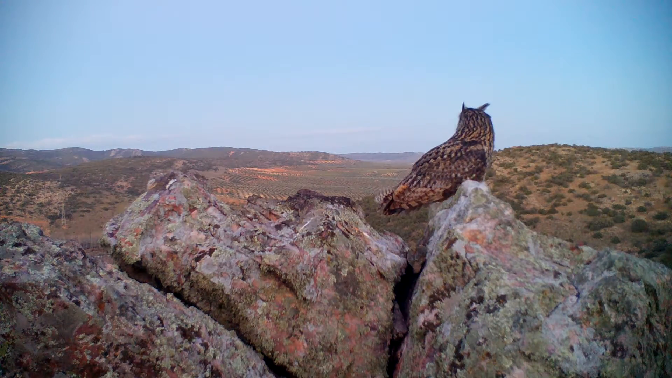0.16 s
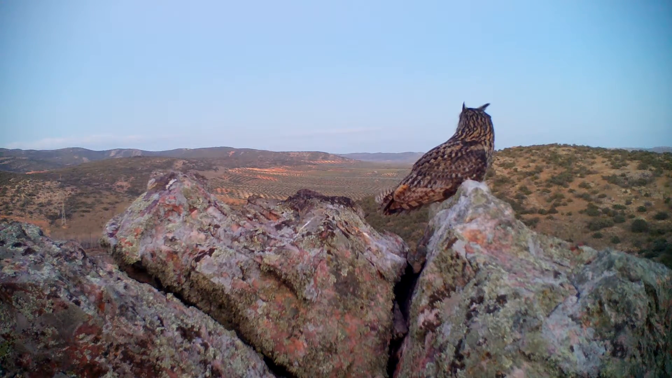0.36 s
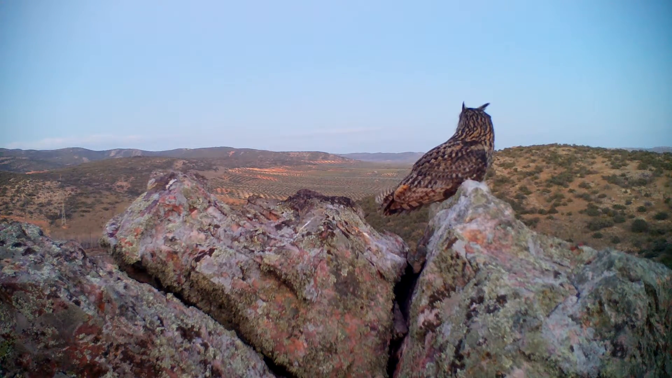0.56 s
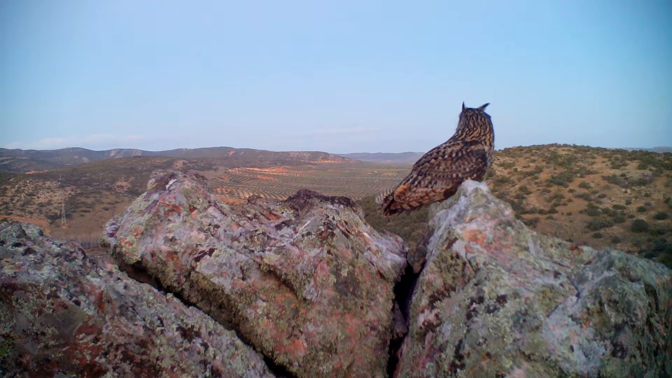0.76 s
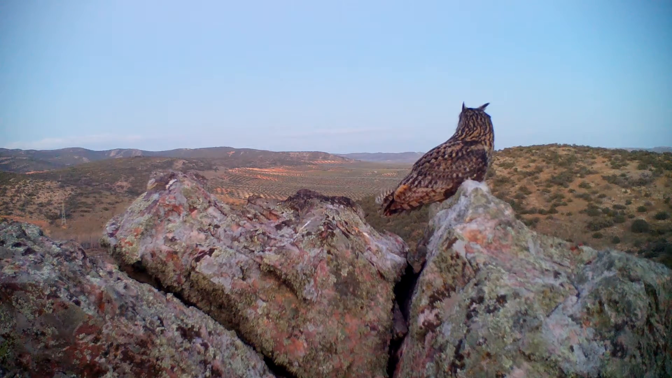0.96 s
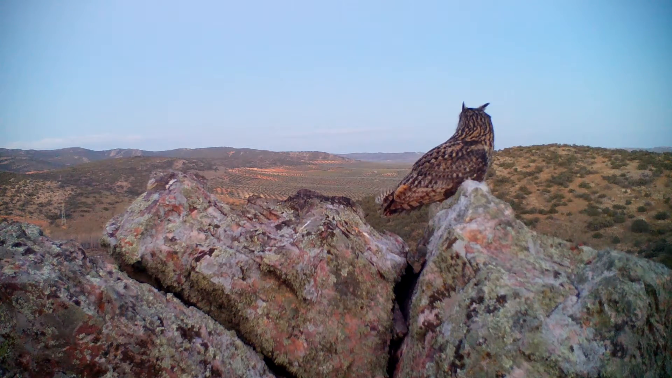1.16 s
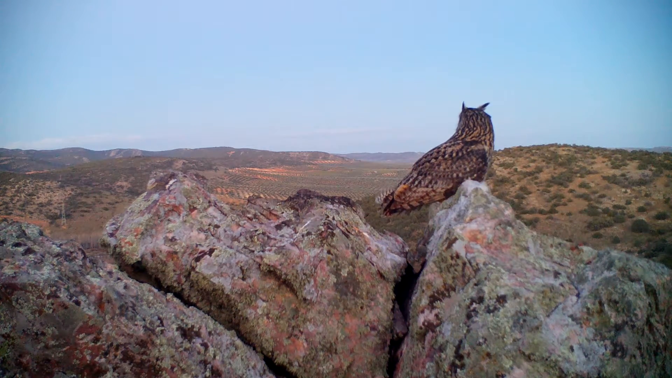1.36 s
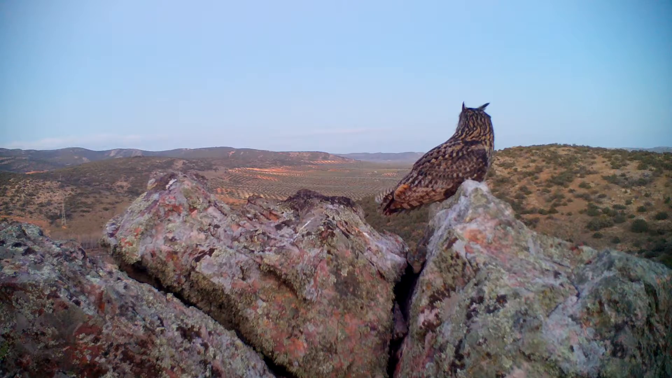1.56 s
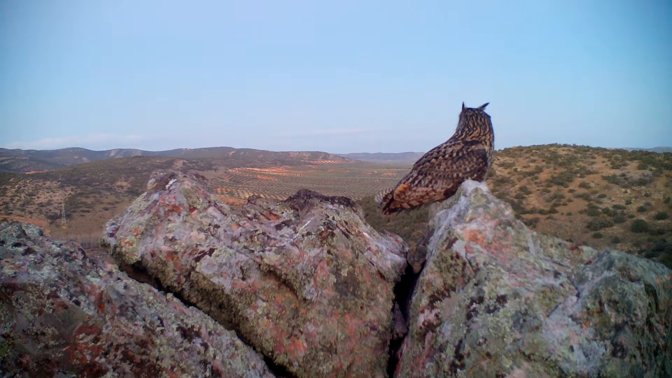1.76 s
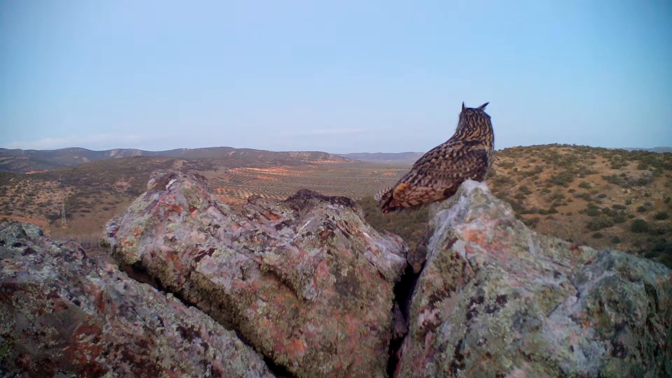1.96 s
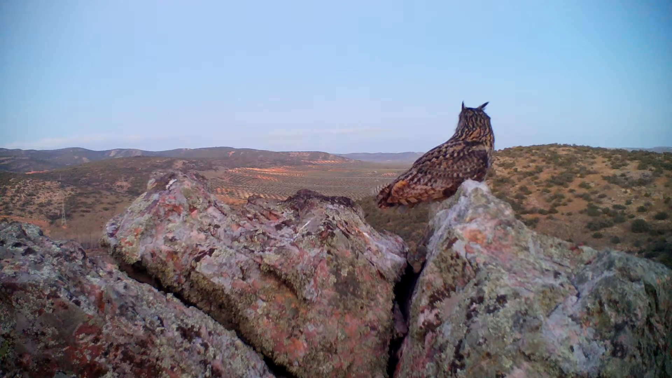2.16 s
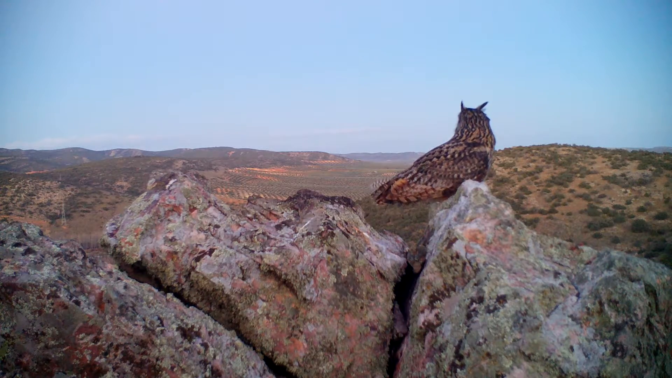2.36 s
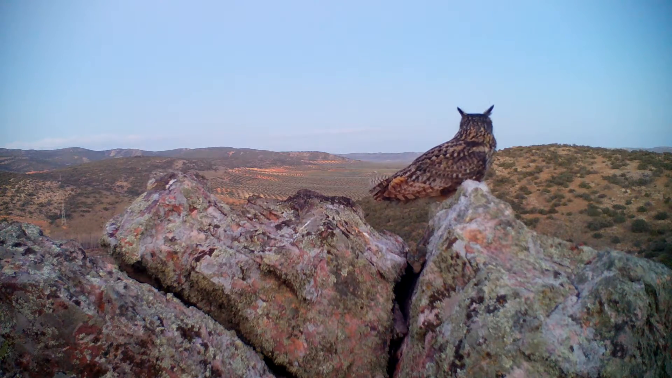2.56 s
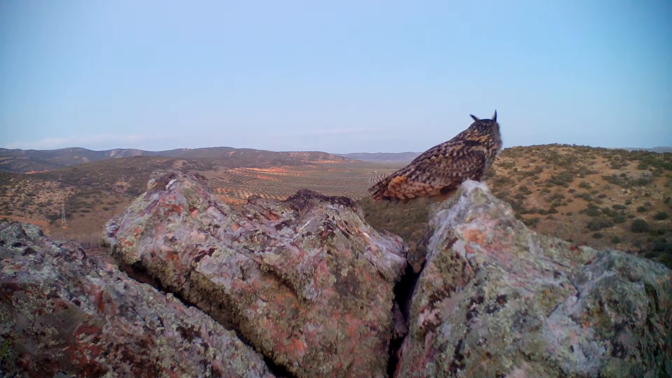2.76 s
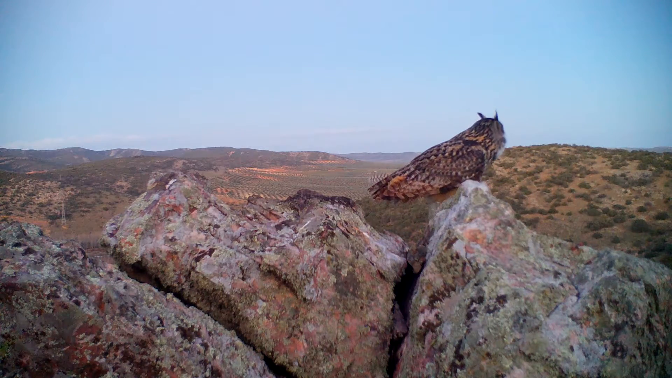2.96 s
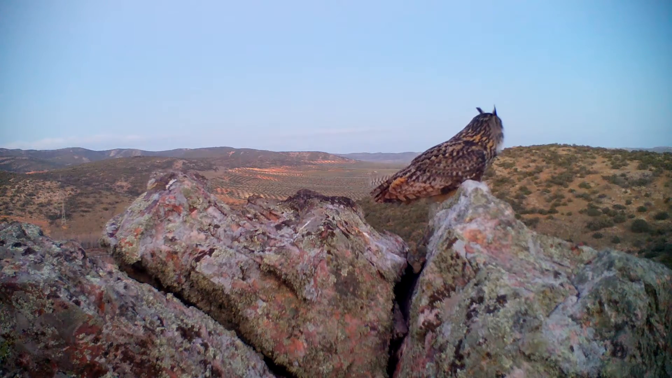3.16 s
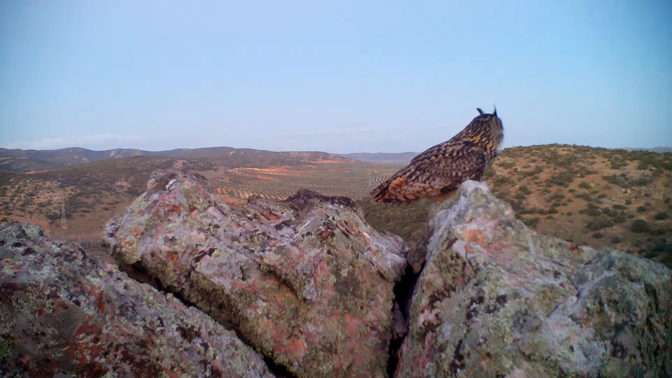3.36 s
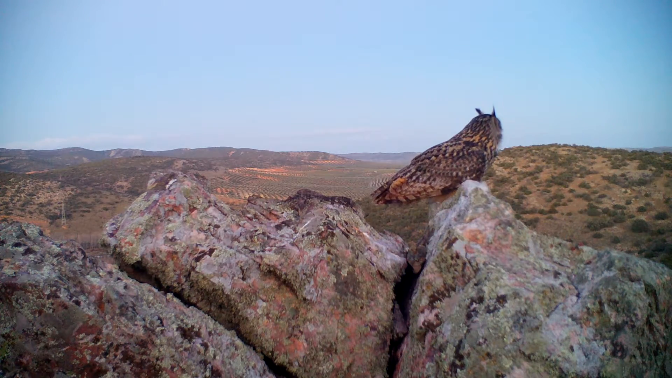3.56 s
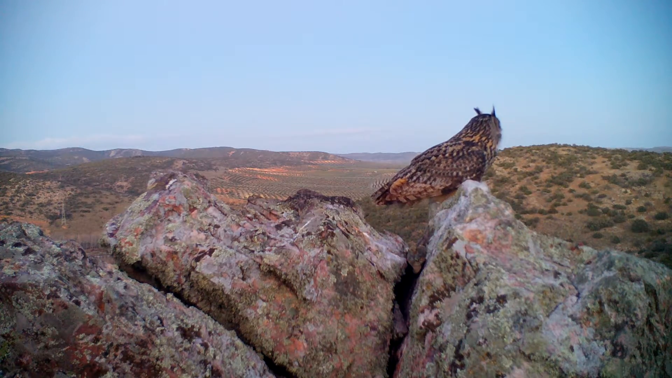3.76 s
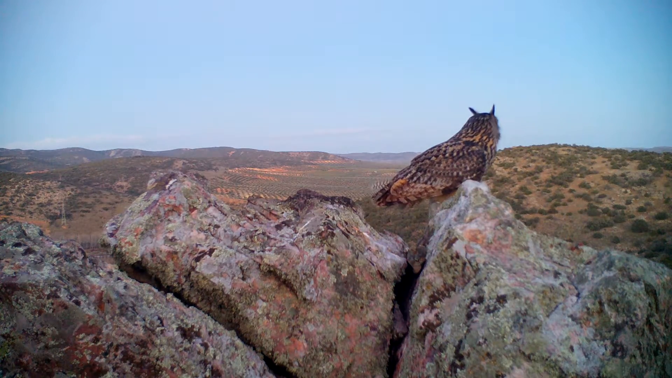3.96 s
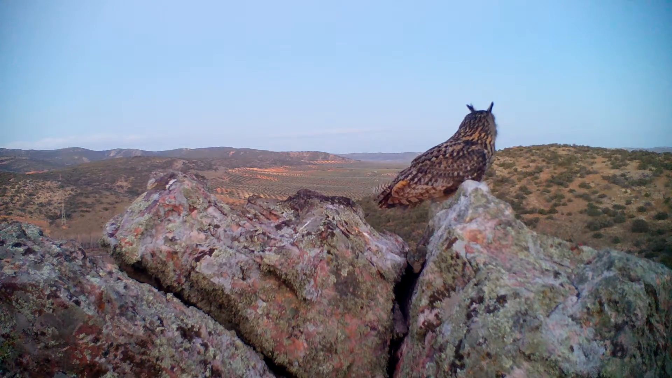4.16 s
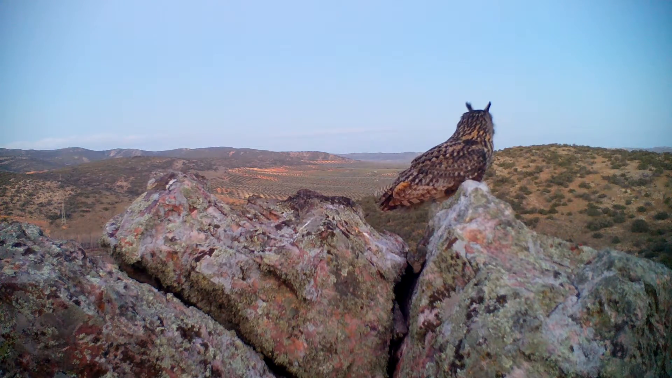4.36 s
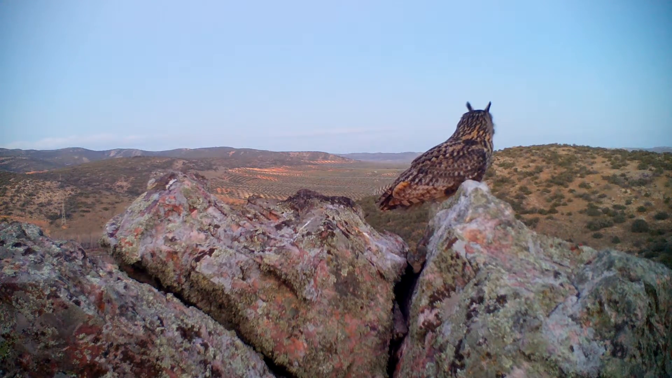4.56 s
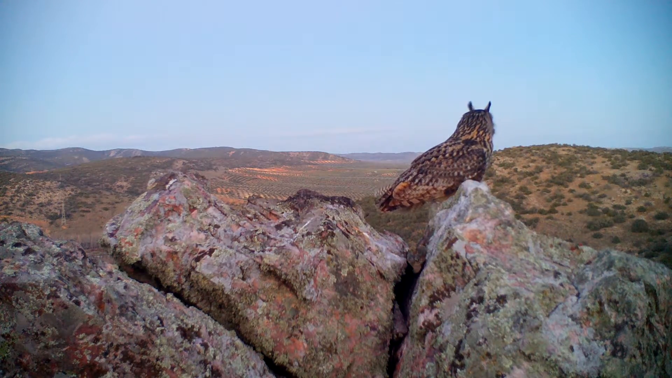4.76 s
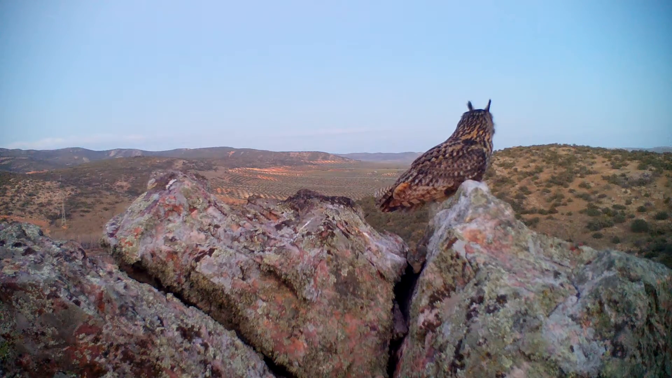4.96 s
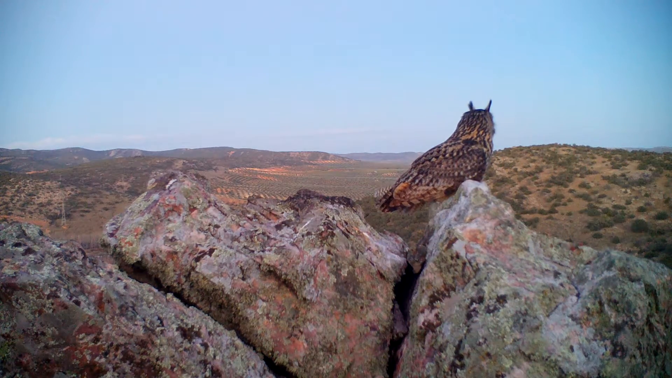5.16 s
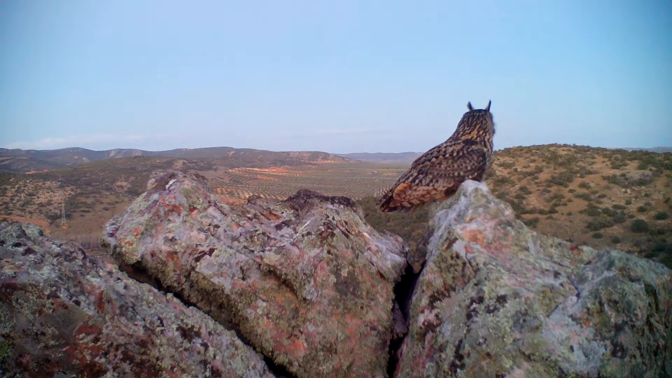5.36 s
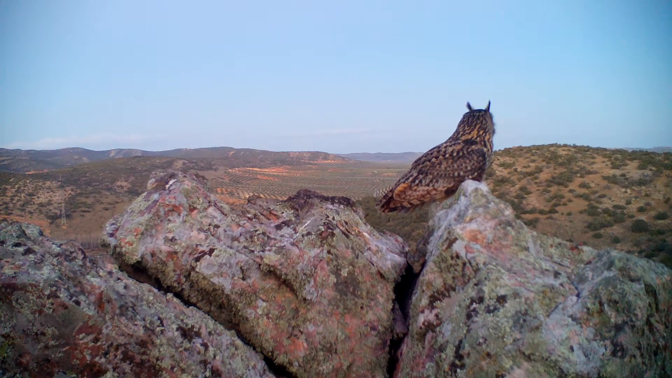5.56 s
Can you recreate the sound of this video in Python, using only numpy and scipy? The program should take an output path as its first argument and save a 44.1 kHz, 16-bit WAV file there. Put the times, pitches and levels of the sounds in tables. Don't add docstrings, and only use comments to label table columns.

```python
import sys
import numpy as np
from scipy import signal
from scipy.fft import rfft, irfft, next_fast_len
from scipy.io import wavfile
from scipy.ndimage import uniform_filter1d, map_coordinates

SR = 44100
rng = np.random.default_rng(int(sys.argv[2]) if len(sys.argv) > 2 else 0)


def how_loud(loudness_db):
    steps = np.asarray(loudness_db, float) / 20
    return 10 ** steps


def to_wav(sig):
    pcm = np.clip(np.atleast_2d(sig), -1, 1) * 32767
    pcm = np.round(pcm).astype(np.int16)
    wavfile.write(sys.argv[1], SR, pcm.T)


N = 246959

# (frequency [Hz], density [dB per Hz])
HUM_SPECTRUM = [(15, -22.5), (146, -13), (311, -6.5), (520, -5.5), (750, -1.05), (2010, -8), (7000, -40),
                (9100, -62.5)]
# (frequency [Hz], density [dB per Hz])
TWITTER_SPECTRUM = [(1500, -60), (2400, 3.5), (3200, 2.5), (4500, -11), (6500, -43.5), (8000, -70.5)]
HUM_DB, TWITTER_DB = -59.5, -75

# (frequency [Hz], density [dB per Hz])
HISS_SPECTRUM = [(5000, -20), (7000, -3), (9000, 0), (15700, 1)]
# (time [s], length [s])
LOCK_SLIPS = [(1.195, 0.028), (1.401, 0.022), (1.568, 0.022), (2.563, 0.023), (4.087, 0.044)]
WHINE_HZ, FLIP_S, FIRST_FLIP_S = 7796.3, .0168033, .0036

# (time [s], level [dB])
GUST_LEVEL = [(4.3, -93), (4.43, -91), (4.484, -82), (4.74, -76), (4.806, -89), (4.932, -67.5),
              (5.102, -60), (5.376, -63), (5.6, -89)]
# (time [s], peak [dB], frequency [Hz])
PUFFS = [(4.924, -54.5, 67), (4.984, -54.5, 130), (5.046, -51, 108), (5.079, -42.5, 131), (5.1, -49, 100),
         (5.113, -37.5, 192), (5.146, -51, 110.6), (5.156, -60, 81), (5.192, -43.5, 290), (5.2, -38.5, 275),
         (5.211, -37.5, 372), (5.221, -27, 156.5), (5.229, -35.5, 393), (5.238, -35.5, 179),
         (5.276, -60, 200), (5.288, -46, 172), (5.342, -51, 128), (5.367, -44.5, 180), (5.388, -48.5, 91)]
# (frequency [Hz], density [dB per Hz])
BUFFET_SPECTRUM = [(10, -21), (20, 4), (60, 3), (110, -9.5), (200, -17.5), (400, -53.5)]

# (time [s], length [s], low voice [Hz], high voice [Hz], level [dB])
WHISTLE_CALLS = [(1.772, 0.068, 4950, 5530, -65), (2.093, 0.063, 4960, 5620, -66),
                 (3.062, .052, 5000, 5620, -71.5), (3.313, 0.035, 4930, 5620, -74),
                 (3.545, 0.033, 4790, 5430, -71.5), (4.037, 0.055, 4970, 5620, -70),
                 (4.52, .048, 5000, 6000, -67), (4.669, 0.081, 4880, 5860, -66.5),
                 (4.853, 0.071, 4770, 5590, -54), (5.007, 0.063, 4720, 6020, -54),
                 (5.156, 0.0593, 4950, 6220, -54), (5.412, .048, 4736, 6130, -57.5)]
# (time [s], length [s], start [Hz], end [Hz], level [dB])
SLIDING_NOTES = [(1.176, 0.012, 2720, 2180, -66), (3.288, 0.0088, 2640, 2530, -66),
                 (3.509, 0.011, 2650, 2680, -60), (3.517, 0.018, 2980, 3260, -70),
                 (3.56, 0.025, 2570, 2480, -74), (3.62, .015, 3560, 3260, -73),
                 (3.718, .03, 6400, 6490, -86), (3.853, .025, 6570, 6600, -91),
                 (4.275, 0.0114, 3600, 2650, -66), (4.28, 0.021, 2900, 2250, -62),
                 (4.353, 0.015, 2830, 2380, -67), (4.435, 0.009, 2830, 2900, -64),
                 (4.516, 0.014, 2150, 1890, -64), (4.728, 0.011, 2640, 2340, -57),
                 (4.839, 0.013, 3330, 3120, -65), (4.99, 0.019, 3700, 3670, -67),
                 (5.328, 0.027, 2674, 1780, -50.5), (5.563, .013, 6760, 6460, -80),
                 (5.585, 0.016, 2900, 2270, -62.5)]
# (delay [s], length [s], start [Hz], end [Hz], level [dB])
FORK_PARTS = [
    (0, 0.019, 3460, 2780, 1.5),
    (.001, 0.023, 6550, 5640, -9.5),
    (.004, .016, 3400, 3750, 1),
]
# (delay [s], length [s], start [Hz], end [Hz], level [dB])
CHUCK_PARTS = [
    (0, 0.0203, 3000, 3750, -3.5),
    (.003, 0.015, 3590, 4330, -8),
    (.018, 0.023, 3184, 3170, -2),
]
# (time [s], pitch factor [-], level [dB])
FORK_CALLS = [(5.144, 0.98, -63), (5.404, 0.98, -64)]
# (time [s], pitch factor [-], level [dB])
CHUCK_CALLS = [(5.306, 1.0, -51), (5.562, 1.09, -48.5)]
USUAL_DB, EASY_HZ, SHORT_S = -63, 5600, .0505
TICK_DB, TICK_GROWS, HIGH_DB, HIGH_GROWS = -59, .57, -71.5, .45
OVERSHOOT, OVERSHOOT_KHZ, OVERSHOOT_GROWS, DROOP, DROOP_KHZ = -.11, .22, .008, .015, .102
SLUR_DB, SLUR_GROWS = -8, -1.1
BREAK_S, AGAIN_S, AGAIN_DB = .0066, .022, -2.5
FADE_DB = -3
BEND = 1.8

# (time [s], length [s], low voice [dB], high voice [dB], pitch factor [-])
CHATTER_SWOOPS = [(4.338, .043, -50, -51.5, 1.06), (4.422, .045, -51.5, -53, 1.01),
                  (4.518, .05, -51.5, -52.5, .98), (4.637, 0.06, -54, -57, .94),
                  (4.749, 0.038, -53.5, -54.5, .94), (4.853, .052, -57.5, -53, .97),
                  (4.956, 0.062, -54.5, -54, .99)]
# (share of rise [-], low voice [Hz], high voice [Hz], level [dB])
SWOOP_RISE = [(0, 1700, 2900, -14), (.28, 2900, 5600, 0), (.5, 4000, 6800, -1), (.7, 4350, 7200, -1),
              (1, 4450, 7300, -2)]
# (frequency [Hz], width [Hz], gain [dB])
SMALL_THROAT = [(2900, 670, 8), (5400, 270, 6)]
RISE_SHARE = .47
HOARSE_HZ = 90

# (time [s], pitch [Hz], effort [dB])
HOOT_AIM = [(2.367, 284.3, -2.5), (2.456, 356.7, 1), (2.6, 359, 1.5), (2.63, 353, 1.2), (2.704, 306.6, .2),
            (2.841, 283.5, 0.4), (2.93, 260, 2.9), (2.999, 221, -1.5), (3.012, 196, -0.5)]
# (pitch [Hz], phase [rad])
SAC_TWIST = [(280, 1.8), (296, 2.1), (303, -.5), (314, -2.3), (330, -1.7), (345, -.4), (360, -.2)]
SYRINX_DB = [-0.5, -9.5, -25, -42.5]
# (multiple [-], level [dB])
UPPER_PARTIALS = [(5, 3.5), (6, -6.5), (7, -8), (8, -9), (9, -11.5)]
# (frequency [Hz], level [dB])
BEAK_RESPONSE = [(1150, -82.5), (1400, -66.5), (1480, -61), (1660, -59), (1750, -67.5), (2100, -69.5),
                 (2500, -65.5), (3300, -74)]
# (frequency [Hz], gain [dB])
SAC_RESPONSE = [(200, -56.5), (270, -44), (335, -22), (365, -23), (420, -27), (700, -25), (1100, -20.5),
                (1400, -13.5)]
# (frequency [Hz], width [Hz], gain [dB])
PIPE_PEAKS = [(237.5, 5.3, -13), (273.3, 12, -11), (452, 41, 7.5), (520, 200, -9.5), (574.4, 15, -13),
              (605.5, 7, -28), (676, 11, -1.5), (840, 32, 8), (1016, 89, -22.5), (1260, 41, -10.5),
              (1401, 37, 6)]
# (frequency [Hz], level [dB], offset [s])
THROAT_RINGS = [(401, 1.5, 0), (773, -8, -.004)]
SLIDE_S, SCOOP_HZ, SCOOP_S, ONSET_DB, ONSET_S = 2.377, 119.9, .013, -19.5, .013
FLAPS_S, FLAP_GAP_S, FLAP_TOP_S, FLAP_DB, FLAP_SPAN_S = 3.013, .007, 3.028, -33, .007


def unit(x):
    return x / np.sqrt(np.mean(x ** 2) + 1e-20)


def wobble(rate, size):
    knots = rng.standard_normal(int(size * rate / SR) + 4)
    return map_coordinates(knots, [np.arange(size) * rate / SR])


def filtered(x, response):
    m = next_fast_len(N + SR // 2)
    return irfft(rfft(x, m) * response(np.fft.rfftfreq(m, 1 / SR)), m)[:N]


def noise(spectrum):
    f, db = np.transpose(spectrum)
    shape = lambda hz: how_loud(np.interp(np.log(hz + 1), np.log(f + 1), db))
    return unit(filtered(rng.standard_normal(N), shape))


def add(track, s, sound):
    part = track[round(s * SR):][:len(sound)]
    part += sound[:len(part)]


def tone(hz, db, fade_s):
    t = np.arange(len(hz)) / SR
    ends = np.clip(np.minimum(t, t[::-1]) / fade_s, 0, 1)
    envelope = np.sqrt(2) * how_loud(db) * np.sin(np.pi / 2 * ends) ** 2
    return envelope * np.sin(2 * np.pi * np.cumsum(hz) / SR)


def bumps(peaks, hz):
    return sum(db / (1 + ((hz - c) / w * 2) ** 2) for c, w, db in peaks)


def echoes(x, t60_s, build_s, low_hz):
    t = np.arange(SR // 2) / SR
    tail = rng.standard_normal(len(t)) * how_loud(-60 * t / t60_s) * (1 - np.exp(-t / build_s))
    wet = signal.fftconvolve(x, tail / np.linalg.norm(tail))[:N]
    return filtered(wet, lambda hz: (hz > low_hz) / (1 + (hz / 6500) ** 4))


def valley():
    hum_db = HUM_DB + .21 * wobble(.29, N) + .15 * wobble(5.4, N)
    hum = how_loud(hum_db) * noise(HUM_SPECTRUM)
    return hum + how_loud(TWITTER_DB + .98 * wobble(20, N)) * noise(TWITTER_SPECTRUM)


def whine():
    t = np.arange(N) / SR
    lost = sum(np.clip(np.minimum(t - s, s + length - t) / .0013, 0, 1) for s, length in LOCK_SLIPS)
    hz = WHINE_HZ + lost * (300 + 200 * wobble(150, N))
    phase = 2 * np.pi * np.cumsum(hz) / SR
    sign = np.sign(np.sin(np.pi * (t - FIRST_FLIP_S) / FLIP_S))
    level = how_loud(-76.5 + lost * (4 * wobble(330, N) - 2.5))
    ticks = 2.2 * np.gradient(np.abs(np.gradient(sign)))
    return level * (ticks + sign * np.sin(phase) + how_loud(-24) * np.sin(2 * phase))


def gust():
    s, db = np.transpose(GUST_LEVEL)
    strength = how_loud(np.interp(np.arange(N) / SR, s, db, left=-120) + 2.5)
    out = strength * unit(how_loud(2.9 * wobble(4.7, N)) * noise(BUFFET_SPECTRUM))
    half = SR // 20
    u = np.arange(-half, half) / SR
    for (at, db, hz), turn in zip(PUFFS, rng.normal(0, 1.0, len(PUFFS))):
        swell = how_loud(db) * np.exp(-(u * hz / .54) ** 2)
        add(out, at - half / SR, swell * np.cos(2 * np.pi * hz * u + turn))
    return out


def whistles():
    out = np.zeros(N)
    for s, length, low_hz, high_hz, low_db in WHISTLE_CALLS:
        louder_db = low_db - USUAL_DB
        tick_db, high_db = TICK_DB + TICK_GROWS * louder_db, HIGH_DB + HIGH_GROWS * louder_db
        strain_khz = (high_hz - EASY_HZ) / 1000
        overshoot = OVERSHOOT + OVERSHOOT_KHZ * strain_khz + OVERSHOOT_GROWS * louder_db
        droop = DROOP + DROOP_KHZ * strain_khz
        tick = np.linspace(2700, 2300, round(.013 * SR))
        add(out, s, tone(tick, tick_db, .0025) + tone(2 * tick, tick_db - 20, .004))
        # (Hz, dB, slur s, delay s)
        voices = ((low_hz, low_db, .003, .009),
                  (high_hz, high_db, .0025, .006),
                  (high_hz + 700, high_db - 20, .0025, .006),
                  (low_hz + high_hz, low_db - 41, .0025, .012),
                  (2 * low_hz, low_db - 42, .0025, .012))
        for hz, db, slur_s, late in voices:
            t = np.arange(round((length - late + BREAK_S + AGAIN_S) * SR)) / SR
            slur = np.exp(-(t / slur_s) ** 2 / 2)
            bend = overshoot * np.exp(-t / .008) - droop * (t / length) ** 2 - .5 * slur
            glide = hz * (1 + bend + .007 * wobble(300, len(t)))
            db = db + (SLUR_DB + SLUR_GROWS * louder_db) * slur
            db = db + FADE_DB * np.minimum(t / length, 1) ** 2 + 2.3 * wobble(200, len(t))
            first, second = round((length - late) * SR), round((length - late + BREAK_S) * SR)
            add(out, s + late, tone(glide[:first], db[:first], .0035))
            if length < SHORT_S:
                add(out, s + length + BREAK_S, tone(glide[second:], db[second:] + AGAIN_DB, .0035))
    return out


def sliding_notes():
    out = np.zeros(N)
    notes = list(SLIDING_NOTES)
    for phrase, calls in ((FORK_PARTS, FORK_CALLS), (CHUCK_PARTS, CHUCK_CALLS)):
        for s, factor, db in calls:
            for late, length, start_hz, end_hz, part_db in phrase:
                notes.append((s + late, length, factor * start_hz, factor * end_hz, db + part_db))
    for s, length, start_hz, end_hz, db in notes:
        u = np.linspace(0, 1, round(length * SR))
        glide = start_hz + (end_hz - start_hz) * u ** BEND
        glide = glide * (1 + .012 * wobble(250, len(u)))
        add(out, s, tone(glide, db + 2.5 * wobble(150, len(u)), .2 * length))
    return out


def chatter():
    out = np.zeros(N)
    share, low_hz, high_hz, shape_db = np.transpose(SWOOP_RISE)
    for s, length, low_db, high_db, factor in CHATTER_SWOOPS:
        t, rise = np.arange(round(length * SR)) / SR, RISE_SHARE * length
        after = np.maximum(t - rise, 0)
        tremble = np.clip((t - rise) / .009 + .4, 0, 1) * np.cos(2 * np.pi * 138 * (t - rise))
        shape = np.interp(t / rise, share, shape_db) - 4 * tremble - 120 * after
        shape = shape + (1 + 100 * after) * wobble(399, len(t))

        def sweep(rise_hz, fall_hz, depth_hz):
            path = np.interp(t / rise, share, rise_hz) - fall_hz * after / .025
            path = uniform_filter1d(path, size=120, mode="nearest")
            return factor * (path + depth_hz * tremble) + HOARSE_HZ * wobble(700, len(t))

        low, high = sweep(low_hz, 2100, 550), sweep(high_hz, 2400, 750)
        add(out, s, tone(low, low_db - 6.5 + shape + bumps(SMALL_THROAT, low), .0023))
        add(out, s, tone(high, high_db - 9.5 + shape + bumps(SMALL_THROAT, high), .002))
        add(out, s, tone(2 * low, low_db + shape - 27, .0068))
        add(out, s, tone(high - low, low_db - 15, .0062))
        for hz in (low + high, 3 * low, 2 * high, high + 2 * low):
            add(out, s, tone(hz + 500 * wobble(900, len(t)), low_db + shape - 40.5, .005))
    return out


def hoot_voice():
    s, hz, effort = np.transpose(HOOT_AIM)
    t = np.arange(round(s[0] * SR), round(s[-1] * SR)) / SR
    hz = np.interp(t, s, hz) - SCOOP_HZ * np.exp(-np.maximum(t - SLIDE_S, 0) / SCOOP_S)
    hz = uniform_filter1d(hz, size=700, mode="nearest")
    phase = 2 * np.pi * np.cumsum(hz) / SR
    effort = np.interp(t, s, effort) + ONSET_DB * np.exp(-((t - s[0]) / ONSET_S) ** 2)
    sac_hz, sac_db = np.transpose(SAC_RESPONSE)
    tract = lambda f: np.interp(np.log(f), np.log(sac_hz), sac_db) + bumps(PIPE_PEAKS, f)
    levels = [db + effort + tract(k * hz) for k, db in enumerate(SYRINX_DB, 1)]
    turns_rad = (0, np.interp(hz, *np.transpose(SAC_TWIST)), -2.7, -1.5)
    voice = np.zeros(len(t))
    for k, (db, turn) in enumerate(zip(levels, turns_rad), 1):
        voice += how_loud(db) * np.cos(k * phase + turn)
    for k, db in UPPER_PARTIALS:
        beak_db = np.interp(k * hz, *np.transpose(BEAK_RESPONSE))
        push_db = .026 * k * (levels[0] + 22.5)
        voice += how_loud(db + beak_db + push_db + 1.9 * wobble(40, len(t))) * np.cos(k * phase)
    ends = np.clip(np.minimum(t - t[0], t[-1] - t) / .008, 0, 1)
    return np.sqrt(2) * ends * voice


def owl():
    out, u = np.zeros(N), np.arange(SR // 20) / SR
    add(out, HOOT_AIM[0][0], hoot_voice())
    for k, (slip, *detunes) in enumerate(rng.standard_normal((6, 3))):
        at = FLAPS_S + FLAP_GAP_S * (k + .12 * slip)
        for (ring_hz, db, late), detune in zip(THROAT_RINGS, detunes):
            db = db + 1.5 * detune + FLAP_DB - ((at - FLAP_TOP_S) / FLAP_SPAN_S) ** 2
            decay = how_loud(db + 2 - 60 * u / .026) * (1 - np.exp(-u / .0014))
            add(out, at + late, decay * np.sin(2 * np.pi * ring_hz * (1 + .057 * detune) * u))
    return out


def scene():
    hoot = filtered(owl(), lambda hz: 1 / (1 + (110 / (hz + 1)) ** 6))
    birds = chatter() + whistles() + sliding_notes()
    scrub = how_loud(-4.5) * echoes(birds, .06, .003, low_hz=1513) * wobble(150, N)
    slopes = how_loud(-10.5) * echoes(birds * (.6 + .8 * wobble(500, N)), .4, .012, low_hz=1500)
    slopes = slopes + how_loud(-29.5) * echoes(hoot, .5, .008, low_hz=150)
    return (hoot + birds + scrub + slopes + gust() + valley())[None]


def top_cut(x):
    return signal.sosfilt(signal.butter(12, 15740, fs=SR, output="sos"), x)


def record(dry):
    dulled_whine = filtered(whine(), lambda hz: .33 + .67 / (1 + (hz / 8600) ** 16))
    mix = dry + dulled_whine + how_loud(-89) * noise(HISS_SPECTRUM)
    return top_cut(mix)


dry = scene()
out = record(dry)
to_wav(out)
```